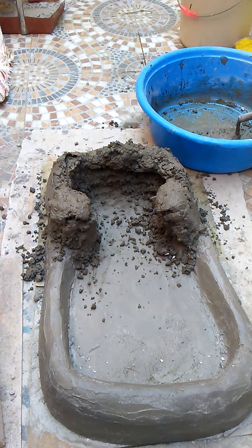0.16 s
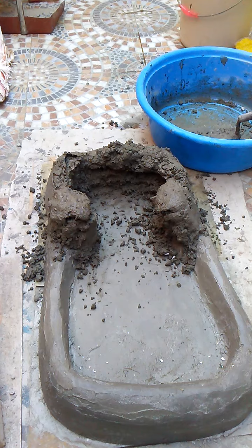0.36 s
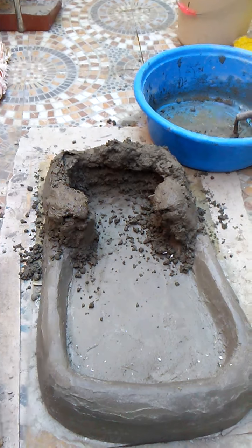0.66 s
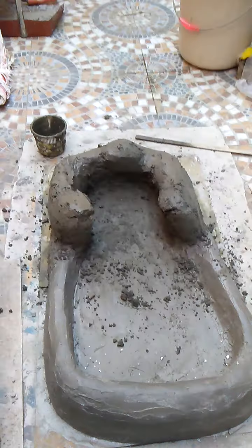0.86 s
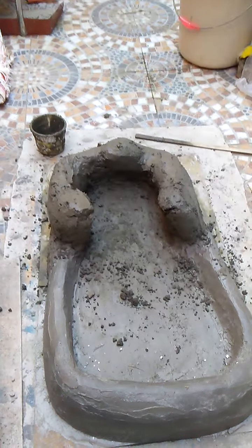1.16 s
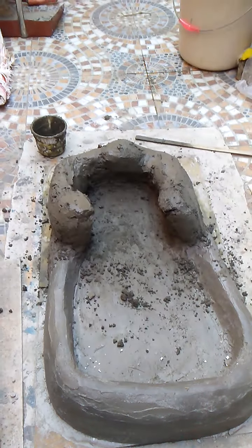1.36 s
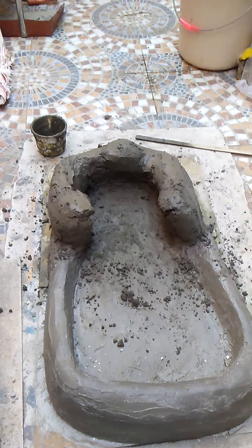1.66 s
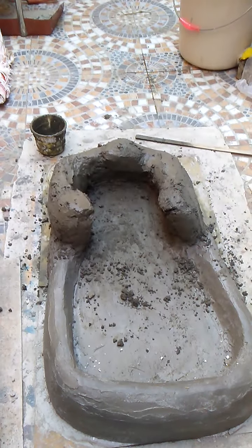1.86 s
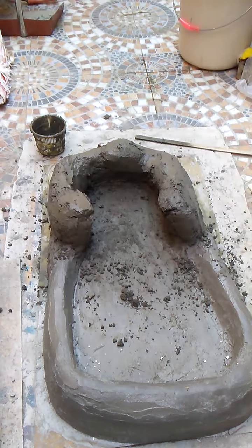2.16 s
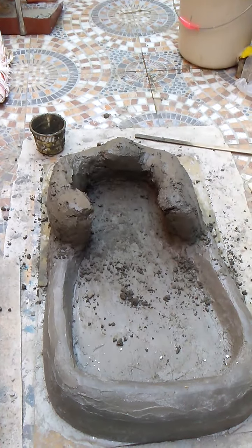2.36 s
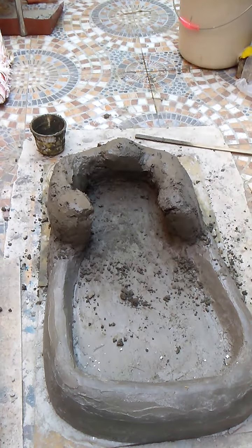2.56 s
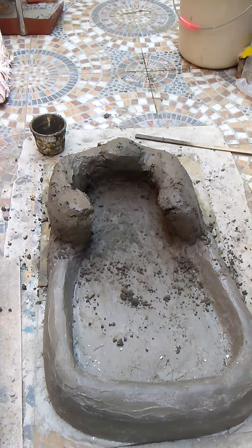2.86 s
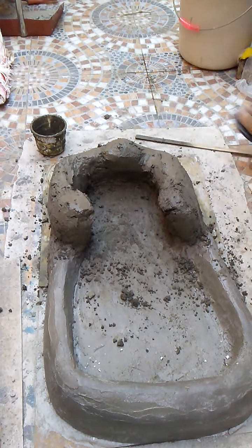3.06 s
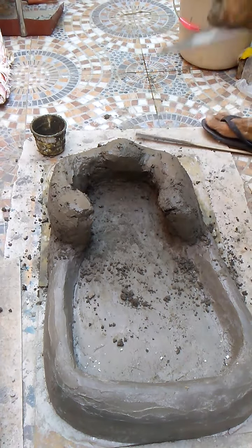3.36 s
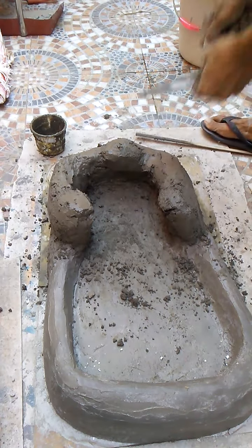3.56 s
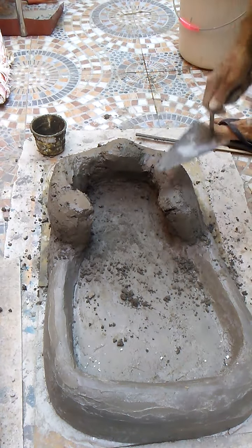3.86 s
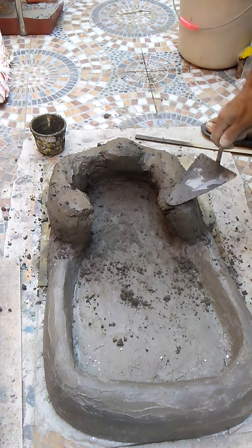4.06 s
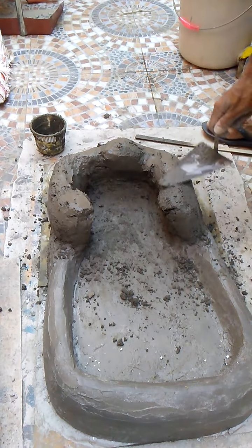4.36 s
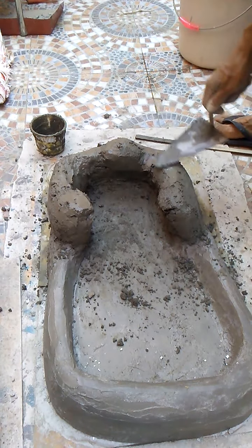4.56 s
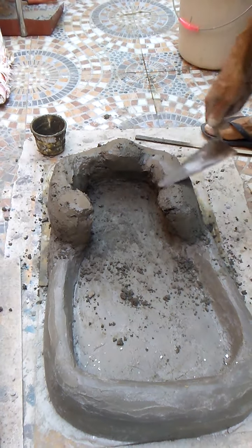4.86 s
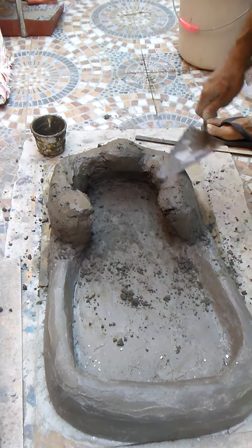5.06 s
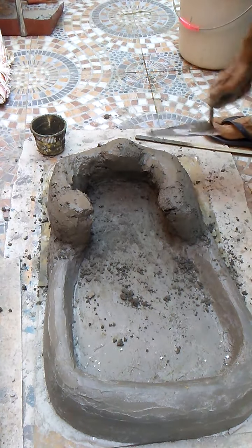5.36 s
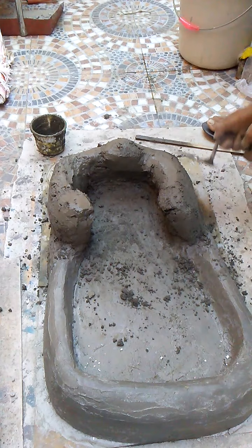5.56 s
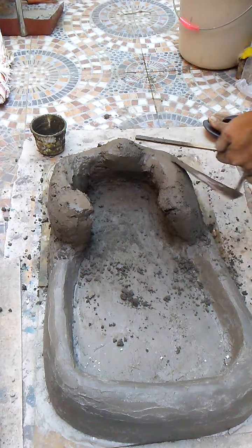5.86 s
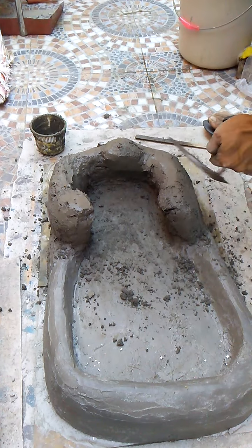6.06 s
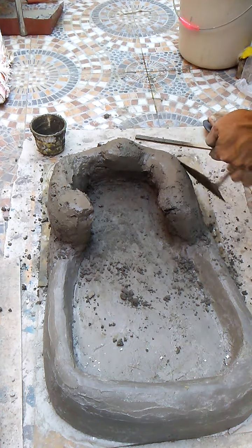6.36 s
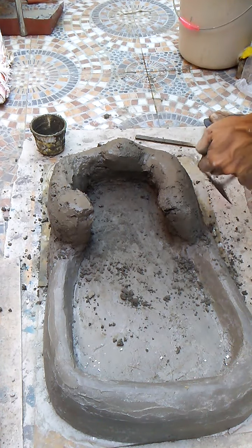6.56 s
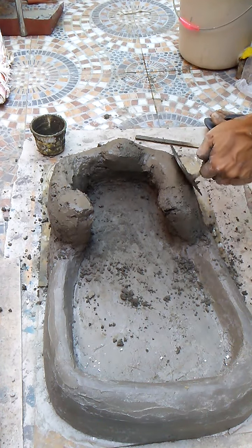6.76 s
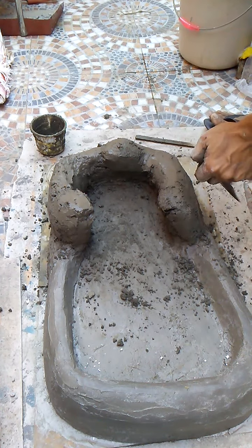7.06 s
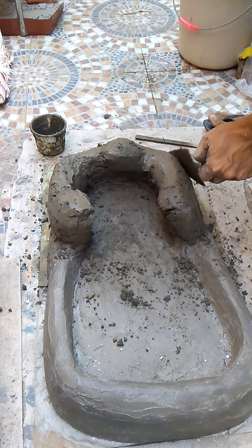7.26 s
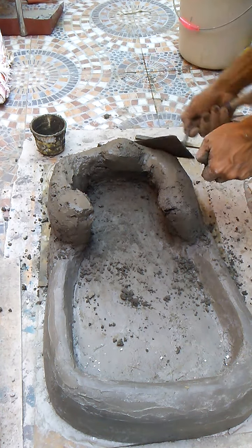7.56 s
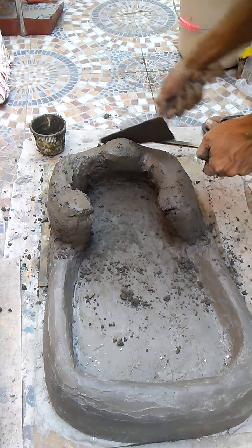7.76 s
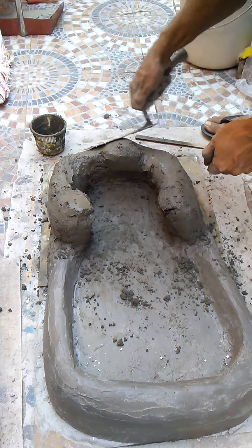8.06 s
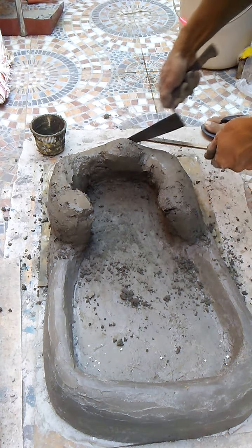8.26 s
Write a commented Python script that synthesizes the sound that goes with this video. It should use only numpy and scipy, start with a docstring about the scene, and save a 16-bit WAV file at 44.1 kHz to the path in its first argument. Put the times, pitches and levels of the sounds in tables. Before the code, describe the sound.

A bird chirps faintly in the distance at the start, alongside a barely audible soft wipe. At about 0.8 seconds two lumps of wet mortar land in quick succession with a splat and a low thump. From 1 to 4 seconds sandals shuffle and scrape over gritty tiles, with dull steps and sharp cracks of grit, the sharpest near 1.7 seconds, a cluster around 2.5 and a stronger scuff near 3.9. From about 4.2 seconds a steel trowel smooths the wet mortar in short, uneven strokes, sand hissing under the lightly ringing blade. The far bird chirps again near 5.5 seconds. The loudest stroke comes near 7 seconds with a brief high squeak, and more scrapes follow until about 8.3. The work is close to one microphone in a small, hard room with short reflections, over quiet room tone and a low rumble.

```python
"""A steel trowel smooths a stove of wet mortar, close to one microphone in a small, hard, tiled room.
First two lumps of mortar drop and the worker shuffles up in sandals, grit cracking under the soles.
Then come the strokes: sand drags under the blade, hisses and sets the steel ringing.
A bird chirps far off, and room tone with a low rumble lies under it all."""
import sys
import numpy as np
from scipy import signal
from scipy.fft import rfft, irfft
from scipy.io import wavfile
from scipy.ndimage import uniform_filter1d

SR = 44100
rng = np.random.default_rng(int(sys.argv[2]) if len(sys.argv) > 2 else 0)


def master_out(mix):
    """Clip the mix to full scale and print it as 16-bit PCM to the path in sys.argv[1]."""
    frames = np.transpose(np.atleast_2d(mix))
    ceiling = np.clip(frames, -1, 1)
    pcm = np.round(ceiling * 32767).astype(np.int16)
    wavfile.write(sys.argv[1], SR, pcm)


N = 370881
TIME = np.arange(N) / SR


def trowel(contact_db=4.0, judder_db=0.7, uneven_db=0.66, smear_db=-34.0):
    """Sand hisses under the steel and rings its modes, which trade strength as the contact patch moves."""
    # Each row: start, pressing and easing in seconds, then in relative dB the peak, the swell up to it,
    # the blade's flex, the edge's bite and the free ring.
    strokes = [(4.176, 0.23, 0.055, -43, 2.5, -10.5, -8, 1.5), (4.362, 0.014, 0.21, -39.5, 4, -13.5, -6, 3),
               (4.811, 0.12, 0.035, -38, 16, -14, -1, 7), (5.04, .11, 0.16, -41, 13, -13, -3.5, 2),
               (5.678, 0.014, 0.24, -45, -7, -13.5, -6, 0), (5.919, 0.0059, .035, -41.5, 4, -14, -2, -1),
               (6.229, 0.018, 0.032, -46, 12, -12, -11, 4), (6.3, .24, .025, -34.5, 13.5, -12, -6.5, 4.5),
               (6.812, .15, 0.021, -27, 18, -16, -8.5, 0), (7.331, 0.022, 0.082, -39.5, 5, -15.5, -3.5, -8),
               (7.425, 0.046, 0.065, -33.5, 12, -13, -12, 1), (7.55, 0.2, 0.029, -37.5, 7.5, -9.5, -9, -4),
               (7.81, 0.019, 0.12, -50, 2.5, -8.5, -5, -8), (8.133, 0.054, 0.11, -42, 14, -10, -10.5, -2)]
    # Bending modes damped by the mortar. Each row: frequency and width in Hz, relative level in dB.
    blade_modes = [(1565, 35, -5), (1775, 55, 0), (2290, 45, -6.5), (2430, 45, -4), (3030, 75, 2),
                   (3360, 60, -5.5), (3860, 140, -2), (4170, 85, 0), (4620, 65, -.5), (4970, 110, -3),
                   (5520, 90, -.5), (6020, 130, 0), (6350, 130, 1.5), (7520, 190, .5), (7830, 220, -2.5),
                   (8200, 260, -3), (8690, 260, -3.5), (9200, 340, -6), (9920, 360, -8.5),
                   (10950, 420, -10.5), (12800, 900, -16)]
    # Dragged sand and smeared mortar. Each row: frequency in Hz, relative density in dB.
    sand_spectrum = [(200, -26), (700, -24), (1300, -13.5), (2700, -15), (3700, -4), (6000, -1.5),
                     (8500, -4), (10500, -12), (13000, -18), (16000, -24)]
    mortar_spectrum = [(150, -26), (310, 4.5), (480, -8), (660, -0.5), (900, -6), (1170, -1), (1400, -27),
                       (3000, -60)]
    stroke, flex_db, bite_db, ring_db = gestures(strokes, attack_s=0.0037, ease_db=7, release_db_s=217)
    drag = grains(per_s=22000, spread_db=2.5)
    drag += from_db(-15) * grains(per_s=130, spread_db=2.0)   # coarse grains catch and tick
    blade = sum((-1) ** k * from_db(db + contact_db * drift(14)) * resonance(drag, hz, width)
                for k, (hz, width, db) in enumerate(blade_modes))
    sand = coloured(grains(per_s=10000, spread_db=1.0), sand_spectrum)
    rub = from_db(ring_db) * rms_one(blade) + sand
    # pressing flat flexes the lowest modes; tilting onto the edge sharpens the top
    flex = from_db(flex_db) * evened(band(rub, 1400, 2650, order=4))
    bite = from_db(bite_db) * evened(band(rub, 9900, 19000, order=4))
    hiss = evened(band(rub, 3140, 8980, order=4))
    # the dull smear grows more slowly with effort than the hiss
    smear = from_db(smear_db) * stroke ** 0.8 * coloured(noise(), mortar_spectrum)
    judder = from_db(judder_db * drift(110) + uneven_db * drift(30))
    return judder * (stroke * (hiss + flex + bite) + smear)


def squeaks():
    """The steel sticks and slips, and single modes squeak."""
    # Each row: start and length in seconds, first and last pitch in Hz, relative level in dB.
    slips = [(4.17, 0.33, 1742, 1750, -53), (5.675, 0.22, 2045, 1738, -55), (5.9, 0.12, 3090, 3140, -59.5),
             (5.915, .05, 10900, 10800, -54), (5.915, 0.041, 12650, 12650, -55),
             (5.915, 0.032, 8250, 8250, -46), (6.53, 0.13, 2410, 2490, -57),
             (6.94, 0.035, 8060, 8230, -32.5), (6.98, 0.14, 2525, 2454, -65.5),
             (6.98, 0.019, 8650, 8700, -27.5), (6.982, 0.014, 11700, 11600, -34.5),
             (7.69, 0.065, 1740, 1680, -45.5)]
    return whistles(slips, width_hz=120)


def shuffles(level_db=-1.66, judder_db=1.54, crunch_db=-10.5):
    """Soles roll grit over the tiles; more weight makes the scrape deeper, finer grit makes it sharper."""
    # Each row: start, pressing and easing in seconds, then in relative dB the peak, the swell up to it,
    # the weight on the sole and the fine grit.
    drags = [(1.205, 0.008, .01, -57.5, 6, -7, 0.5), (1.235, 0.054, 0.021, -43, 9.5, -11.5, -10),
             (1.545, 0.044, 0.072, -38, 4.5, -9.5, -10), (1.787, 0.0068, 0.021, -42.5, -1, -2, -5.5),
             (1.88, .22, .12, -57.5, 2, -7, -9), (2.146, 0.0092, 0.024, -47, 8, -3, 0.5),
             (2.29, 0.098, 0.11, -47, 12.5, -15, -4.5), (2.44, 0.033, .02, -36, 21, -15, -1.5),
             (2.541, 0.028, 0.054, -39, 0.5, -1.5, -5), (2.612, 0.016, 0.016, -35.5, -3, -9.5, -7.5),
             (2.737, 0.023, .012, -44, 10, -8, -8.5), (2.8, 0.12, 0.14, -63, 0, -7, 1),
             (3.106, 0.0046, 0.04, -49.5, 1, -16, -9.5), (3.199, 0.0054, 0.028, -50, -14, -2.5, 4.5),
             (3.272, 0.064, 0.027, -41, 10.5, -20, -2), (3.385, 0.053, 0.047, -38, 11.5, -10, -5),
             (3.541, 0.031, .025, -37, 5.5, -11.5, -11), (3.648, .065, 0.049, -39.5, 10.5, -9, -4),
             (3.79, 0.036, 0.022, -47.5, 5.5, -8.5, 1.5), (3.883, .19, 0.026, -27, 14.5, -8.5, -8)]
    # A scraping sandal. Each row: frequency in Hz, relative density in dB.
    sole_spectrum = [(120, -59), (200, -14), (353, 10), (482, 4), (791, -16.5), (968, -9.5), (1300, -13.5),
                     (1560, -12.5), (2330, -9), (2910, -6), (6050, -0.5), (9060, -9.5), (14100, -26),
                     (16000, -33)]
    move, weight_db, fine_db = gestures(drags, attack_s=0.0035, ease_db=7.5, release_db_s=270)
    scrape = coloured(grains(per_s=7000, spread_db=1.0), sole_spectrum)
    coarse_grit = grains(per_s=4000, spread_db=-2.5)
    fine_grit = coloured(grains(per_s=7400, spread_db=1.0), sole_spectrum)
    hiss = rms_one(band(scrape, 3500, 9900, order=3))
    crunch = from_db(crunch_db + .5 * weight_db) * rms_one(band(coarse_grit, 2760, 3450, order=3))
    body = from_db(weight_db - 3.0) * rms_one(band(scrape, 1000, 2260))
    fine = from_db(fine_db + 3.0) * rms_one(band(fine_grit, 8860, 16000))
    return move * from_db(level_db + judder_db * drift(140)) * (hiss + crunch + body + fine)


def cracks():
    """Grit cracks and sandals slap: each is a burst of fractures that dies in milliseconds."""
    # Each row: start in seconds, level in dB, time to fall 60 dB in seconds.
    bursts = [(1.071, -46.5, 0.021), (1.276, -33, 0.046), (1.5485, -49, 0.044), (1.718, -16.5, 0.025),
              (1.7207, -20.5, .0091), (1.79, -34.5, .055), (2.016, -44.5, .036), (2.102, -50.5, 0.061),
              (2.154, -42, 0.099), (2.379, -35.5, 0.081), (2.476, -24, .017), (2.5448, -24.5, .017),
              (2.562, -32.5, 0.02), (2.621, -32, 0.099), (2.765, -38.5, 0.052), (3.106, -62, 0.027),
              (3.201, -46, 0.021), (3.327, -51, .06), (3.544, -42, .034), (3.712, -37.5, .054)]
    # Breaking grit. Each row: frequency in Hz, relative density in dB.
    grit_spectrum = [(200, -16), (500, -17), (900, -11), (1500, -13.5), (2300, -16), (3000, -1.5),
                     (5000, -2.5), (6500, 0.5), (9000, -4.5), (12000, -9), (16000, -12)]
    out, t = np.zeros(N), TIME[:SR // 4]
    fracture = coloured(noise(), grit_spectrum)
    for s, db, t60 in bursts:
        burst = rms_one(band(fracture[int(s * SR):][:len(t)], 133, 8600))
        add(out, s, from_db(db) * burst * dying(t, t60))
    return out


def footfalls():
    """Dull steps and knocks: a soft contact pushes out a puff in one broad band."""
    # Each row: start in seconds, level in dB, centre in Hz, width in octaves, 60 dB decay in seconds.
    contacts = [(1.587, -45.5, 990, 4.6, 0.41), (1.719, -43.5, 850, 1.7, 0.049),
                (1.79, -49, 905, 3.1, 0.35), (2.15, -57, 900, 3.2, 0.14), (2.437, -41, 556, 2.34, 0.22),
                (2.47, -47, 50, 0.67, 0.45), (2.472, -46, 384, 1.8, 0.1), (2.5625, -28, 1460, 2.3, 0.1),
                (2.918, -38, 1280, 0.65, 0.027), (3.281, -40, 870, 3.3, .2), (3.54, -39.5, 684, 2.1, 0.11),
                (3.569, -41, 296, 3.6, 0.056), (3.601, -52, 119, 0.91, 0.34), (3.656, -43, 460, 0.75, .074),
                (3.891, -37.5, 1200, 1.7, 0.07), (4.005, -33, 1550, 1.4, 0.077), (7.18, -62, 360, 0.51, .3)]
    out, t = np.zeros(N), TIME[:SR // 3]
    for s, db, hz, octaves, t60 in contacts:
        low, high = hz / 2 ** (octaves / 2), hz * 2 ** (octaves / 2)
        puff = band(noise(len(t)) * dying(t, t60), low, high)
        add(out, s, from_db(db) * puff * np.sqrt(SR / 2 / (high - low)))
    return out


def lumps(thump_hz=68, thump_t60=0.19, plop_t60=0.054, splat_t60=0.059, spray_t60=0.1):
    """A wet lump of mortar splats and sprays, trapped air plops, and the floor thumps."""
    # Each row: start in seconds, splat and thump in dB, low plop in Hz and dB, high plop in Hz and dB.
    landings = [(0.764, -41, -32.5, 666, -42, 1330, -56), (.817, -39, -36, 348, -38.5, 1172, -37)]
    out, t = np.zeros(N), TIME[:SR // 3]
    for s, splat_db, thump_db, low_hz, low_db, high_hz, high_db in landings:
        modes = [(thump_hz, thump_db, thump_t60), (low_hz, low_db, plop_t60), (high_hz, high_db, plop_t60)]
        for hz, db, t60 in modes:
            add(out, s, from_db(db) * np.sin(2 * np.pi * hz * t) * dying(t, t60))
        splat = rms_one(band(noise(len(t)), 94, 1120)) * dying(t, splat_t60)
        spray = rms_one(band(noise(len(t)), 1800, 8700)) * dying(t, spray_t60)
        add(out, s, from_db(splat_db) * (splat + from_db(-10) * spray))
    return out


def brushing():
    """Something soft is wiped faintly over the floor."""
    # Each row: start, pressing and easing in seconds, relative peak and the swell up to it in dB.
    wipes = [(.26, .09, 0.11, -60.5, 4), (.53, .04, .08, -75, 3)]
    wipe, = gestures(wipes, attack_s=0.018, ease_db=7, release_db_s=70)
    return wipe * rms_one(band(noise(), 5500, 9600))


def bird():
    """Hoarse chirps, far from the microphone."""
    # Each row: start and length in seconds, first and last pitch in Hz, relative level in dB.
    chirps = [(.05, .14, 3700, 3750, -62), (.06, .17, 4450, 4550, -60), (.11, .13, 4950, 5050, -66),
              (.47, .13, 5000, 4400, -67.5), (.52, .15, 3750, 3000, -63.5), (5.43, .1, 4200, 4100, -59),
              (5.43, .12, 4800, 4950, -60), (5.43, .18, 5600, 5600, -63), (5.48, .18, 3550, 3450, -63),
              (5.52, .13, 4100, 4000, -62)]
    return from_db(-5) * whistles(chirps, width_hz=520)


def room(x, gap_s=0.0063):
    """Diffuse reflections from hard walls reach the microphone after a gap, the treble dying first."""
    # Each row: frequency in Hz, time to fall 60 dB in seconds.
    decay_times = [(100, 0.66), (1000, 0.34), (5000, 0.33), (16000, 0.21)]
    t, edges = TIME[:SR // 2], np.geomspace(80, 18000, 8)
    tail = sum(band(noise(len(t)), low, high) * dying(t, at_hz(decay_times, np.sqrt(low * high)))
               for low, high in zip(edges, edges[1:]))
    tail *= t > gap_s
    return signal.fftconvolve(x, tail / np.linalg.norm(tail))[:N]


def crack_echoes(count=4):
    """A crack sends a different colour toward each wall, so its echoes blend into a smooth tail."""
    return sum(room(cracks()) for _ in range(count)) / np.sqrt(count)


def room_tone(air_db=-62.5, rumble_db=-58.5, waver_db=0.5):
    """Steady air and the slightly wavering low rumble of the surroundings."""
    # Each row: frequency in Hz, relative density in dB.
    air_spectrum = [(90, -4), (200, -6), (400, -9.5), (700, -11.5), (1300, -16.5), (3300, -19.5),
                    (5500, -20), (8300, -20.5), (11000, -23), (16000, -24.5)]
    rumble_spectrum = [(20, -40), (36, -19), (46, 5.5), (54, 1), (70, -3.5), (90, -7.5), (130, -14.5),
                       (200, -25.5), (500, -40), (2000, -72)]
    air = from_db(air_db) * coloured(noise(), air_spectrum)
    rumble = from_db(rumble_db + waver_db * drift(14)) * coloured(noise(), rumble_spectrum)
    return air + rumble


def gestures(rows, attack_s, ease_db, release_db_s):
    """Each move lands, swells, eases and lets go. Gives the gain, then the sounding move's colours."""
    t, power, colours = TIME[:SR], np.full(N, 1e-14), np.zeros((len(rows[0]) - 5, N))
    for s, press_s, ease_s, db, swell_db, *colour in rows:
        lift_s = press_s + ease_s
        shape_db = np.interp(t, [0, press_s, lift_s], [-swell_db, 0, -ease_db])
        shape_db -= release_db_s * np.maximum(t - lift_s, 0)
        landing = np.minimum(t / (attack_s + 0.055 * press_s), 1)   # slow moves land softly
        move_power = (from_db(db + shape_db) * landing) ** 2
        add(power, s, move_power)
        for track, value in zip(colours, colour):
            add(track, s, value * move_power)
    return np.sqrt(power), *(colours / power)


def grains(per_s, spread_db):
    """Sand grains slipping: random clicks of uneven size."""
    born = rng.random(N) < per_s / SR
    return rms_one(born * noise() * from_db(spread_db * np.minimum(rng.exponential(1, N), 4)))


def whistles(rows, width_hz):
    """Hoarse gliding tones: the strength flutters so fast that each line widens into a band."""
    out, flutter = np.zeros(N), drift(width_hz) + 1j * drift(width_hz)
    for s, length, start_hz, end_hz, db in rows:
        n = int(length * SR)
        tone = np.exp(2j * np.pi * np.cumsum(np.linspace(start_hz, end_hz, n)) / SR)
        hoarse = rms_one((tone * flutter[int(s * SR):][:n]).real)
        add(out, s, from_db(db) * signal.windows.tukey(n, .7) * hoarse)
    return out


def resonance(x, hz, width_hz):
    """Two-pole resonance with a peak gain of 1."""
    r = np.exp(-np.pi * width_hz / SR)
    poles = [1, -2 * r * np.cos(2 * np.pi * hz / SR), r * r]
    return signal.lfilter(np.array([1, 0, -1]) * (1 - r * r) / 2, poles, x)


def band(x, low_hz, high_hz, order=2):
    """Causal band-pass."""
    sos = signal.butter(order, [low_hz, high_hz], "band", fs=SR, output="sos")
    return signal.sosfilt(sos, x + 1e-18)


def coloured(x, spectrum):
    """Give a steady excitation a spectrum; rms 1."""
    hz = np.fft.rfftfreq(N, 1 / SR)
    low_cut = np.minimum(1, hz / spectrum[0][0]) ** 2
    return rms_one(irfft(rfft(x) * from_db(at_hz(spectrum, hz)) * low_cut, N))


def at_hz(points, hz):
    """Read a table on a log-frequency axis."""
    f, value = np.transpose(points)
    return np.interp(np.log(hz + 1e-3), np.log(f), value)


def noise(n=N):
    """White noise of spread 1."""
    return rng.standard_normal(n)


def drift(per_s):
    """Random wandering of spread 1."""
    knots = noise(8192)
    return np.interp(TIME * per_s, np.arange(len(knots)), knots) * np.sqrt(3 / 2)


def dying(t, t60):
    """Exponential decay, 60 dB in t60 seconds."""
    return np.exp(-np.log(1000) * t / t60)


def evened(x):
    """Hold the rms near 1 over every tenth of a second."""
    return x / np.sqrt(uniform_filter1d(x * x, SR // 10) + 1e-12)


def rms_one(x):
    """Scale to unit rms."""
    return x / np.sqrt(np.mean(x ** 2) + 1e-20)


def from_db(db):
    """Decibels to gain."""
    return 10 ** (np.asarray(db) / 20)


def add(out, s, sound):
    """Mix a short sound in at s seconds."""
    i = int(s * SR)
    out[i:i + len(sound)] += sound[:N - i]


def scene():
    """The work close to the microphone arrives mostly direct, the far bird mostly off the walls."""
    rubbing = trowel() + squeaks() + shuffles() + brushing()
    grit, steps, mortar, chirps = cracks(), footfalls(), lumps(), bird()
    direct = from_db(-0.64) * rubbing + grit + steps + mortar + .5 * chirps
    to_walls = from_db(-10) * rubbing + from_db(-8) * steps + from_db(-29) * mortar + chirps
    reflected = room(to_walls) + from_db(-9) * crack_echoes()
    return (direct + reflected + room_tone())[None]


def record(dry, cutoff_hz=15900):
    """One channel, its top cut steeply."""
    return signal.sosfilt(signal.ellip(10, .1, 70, cutoff_hz, fs=SR, output="sos"), dry)


dry = scene()
out = record(dry)
master_out(out)
```